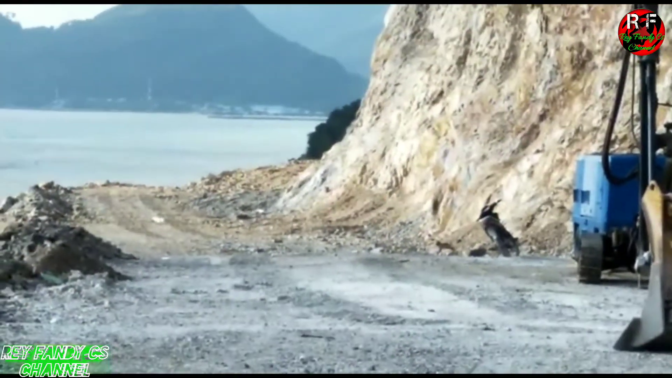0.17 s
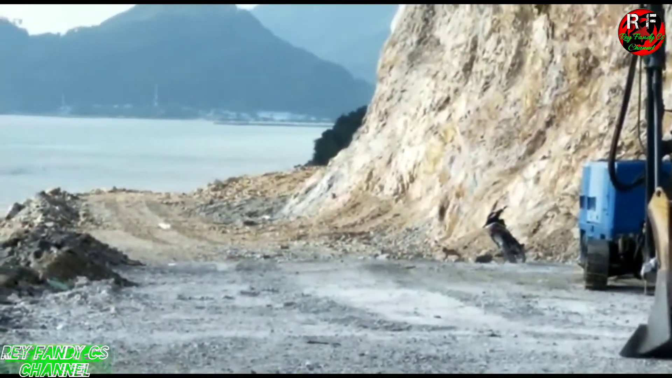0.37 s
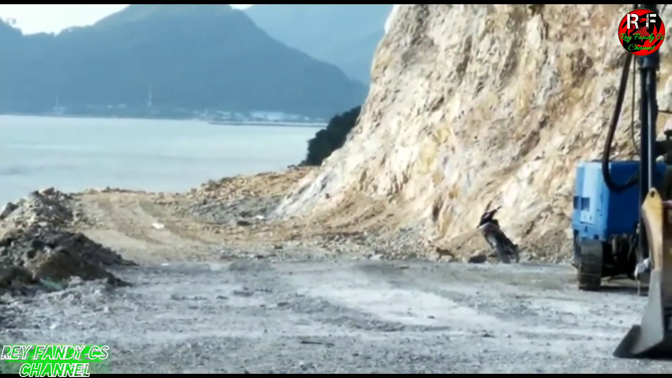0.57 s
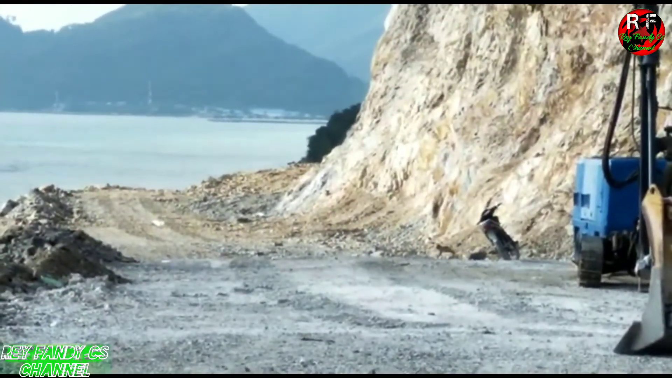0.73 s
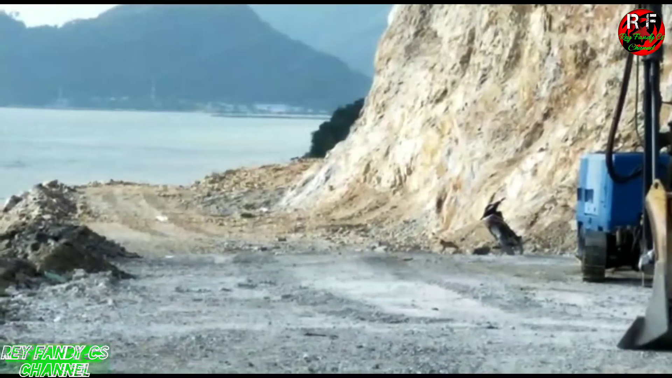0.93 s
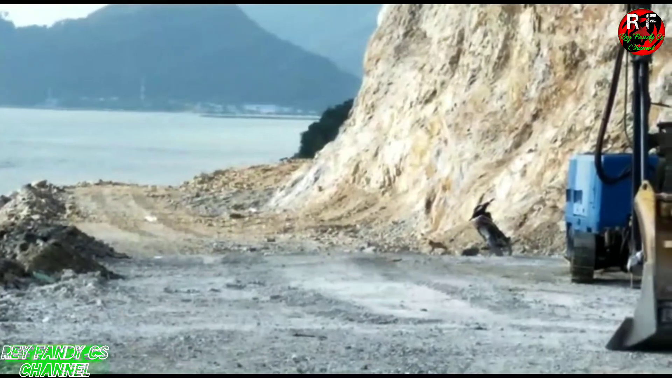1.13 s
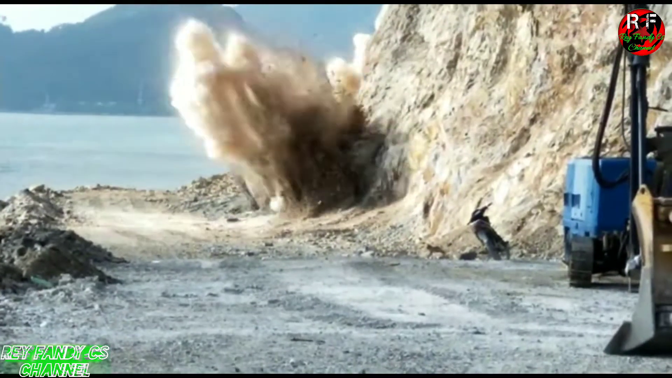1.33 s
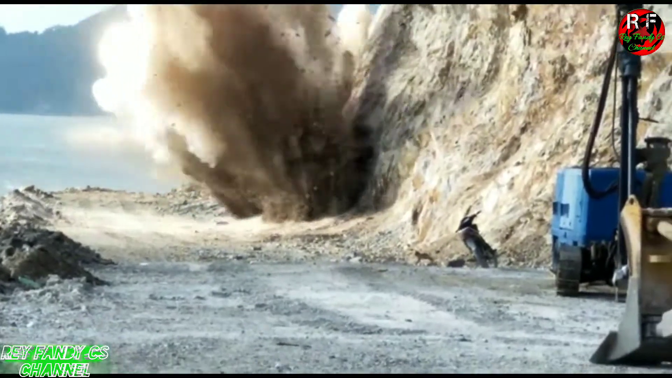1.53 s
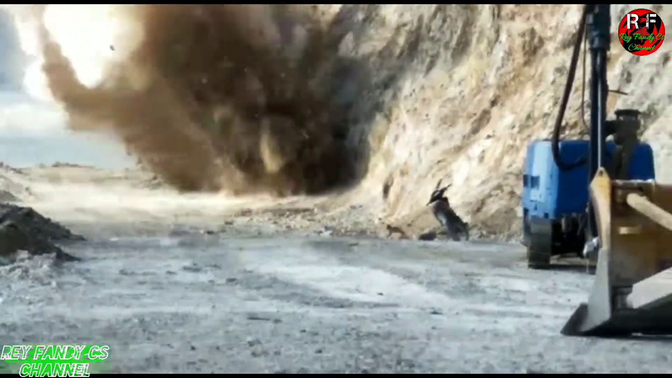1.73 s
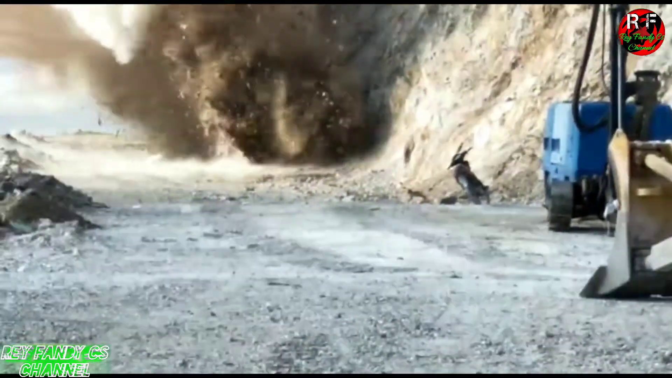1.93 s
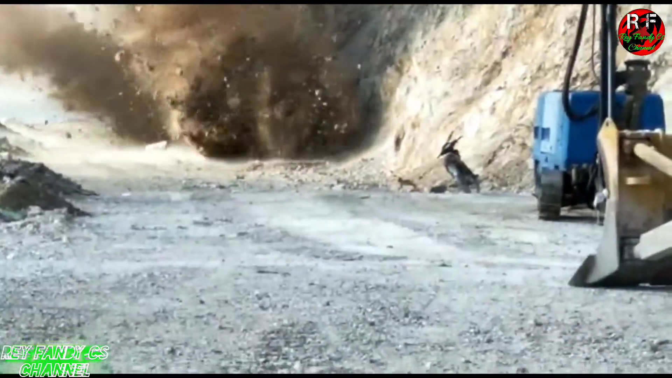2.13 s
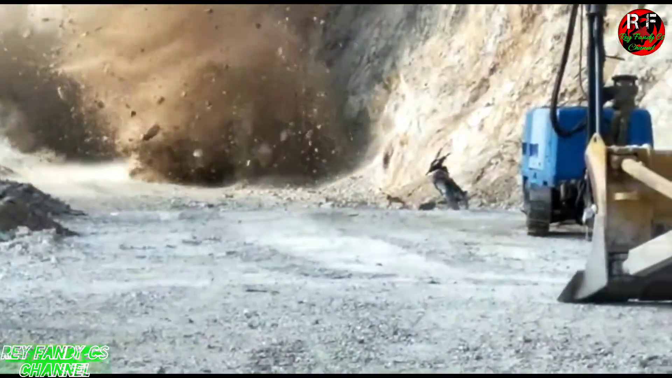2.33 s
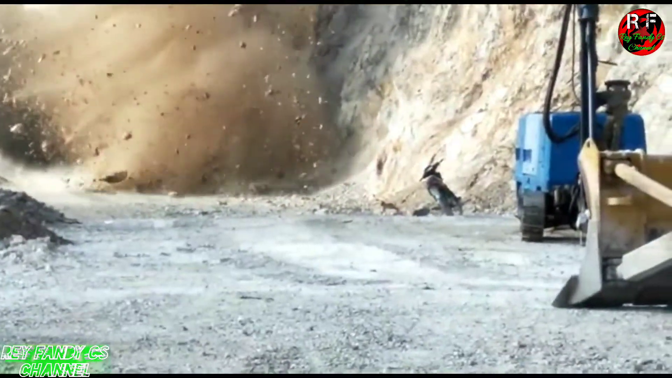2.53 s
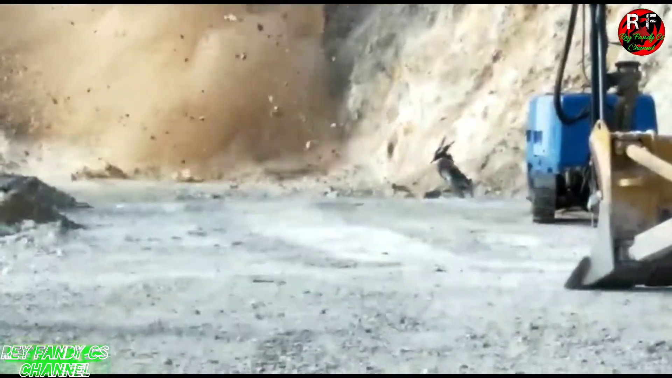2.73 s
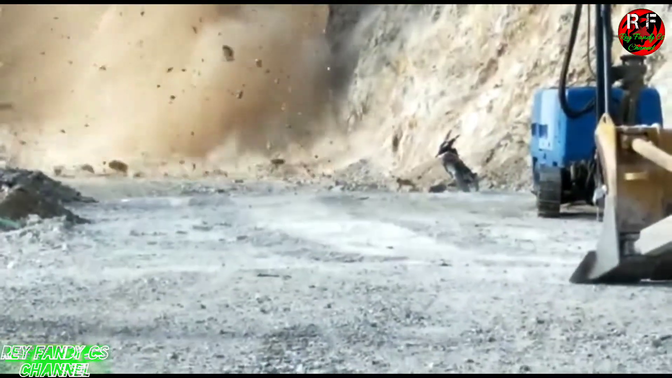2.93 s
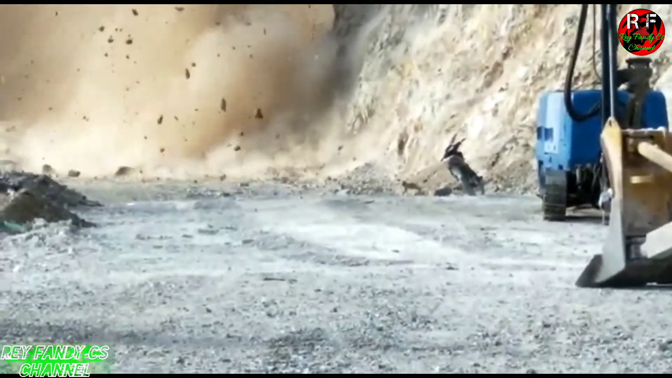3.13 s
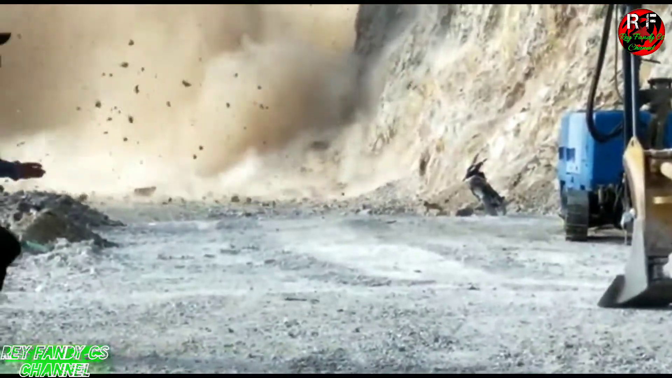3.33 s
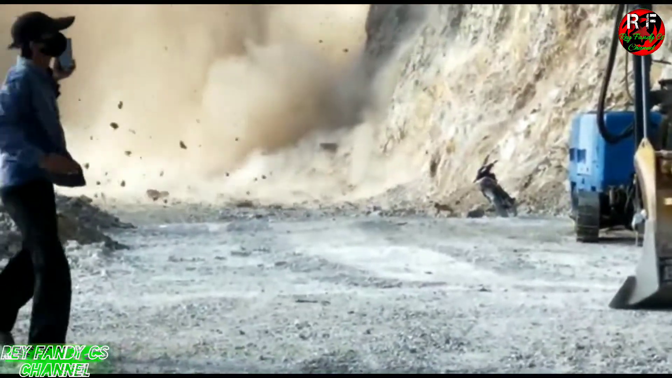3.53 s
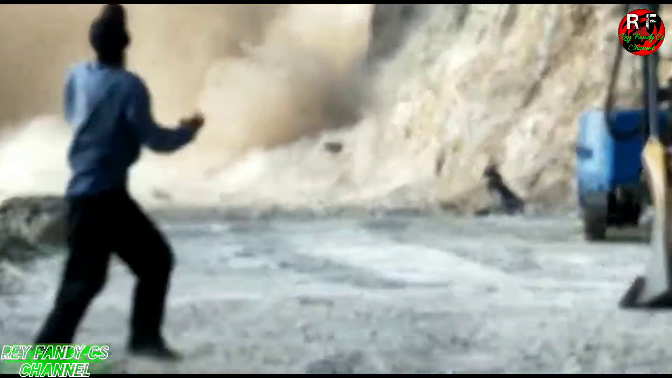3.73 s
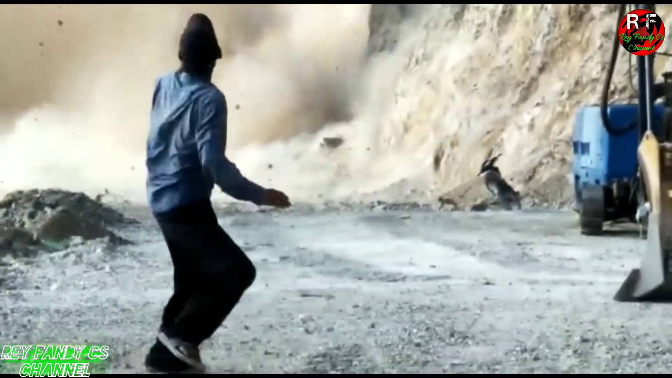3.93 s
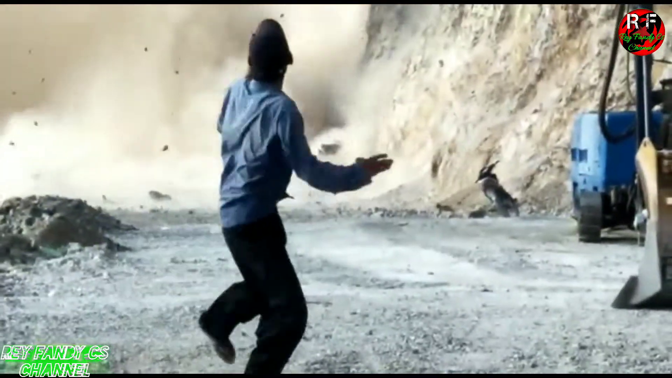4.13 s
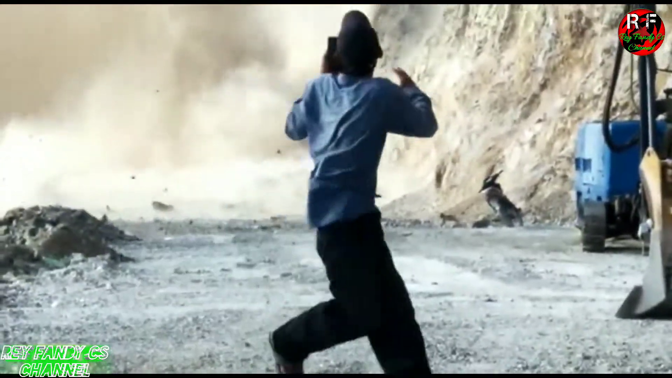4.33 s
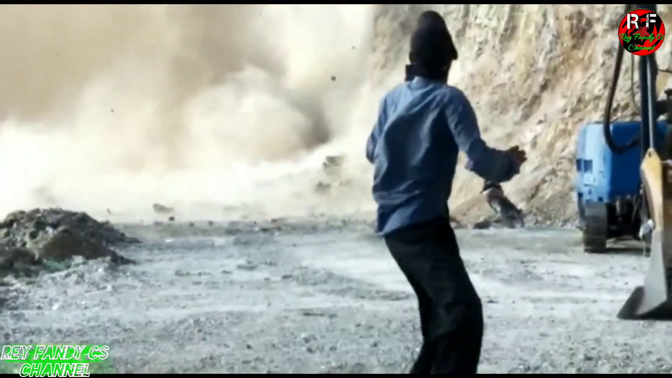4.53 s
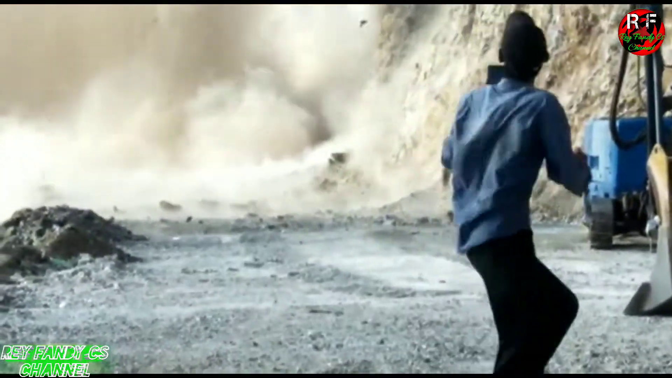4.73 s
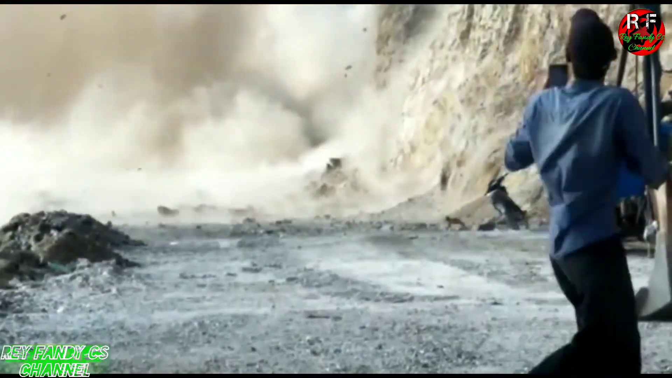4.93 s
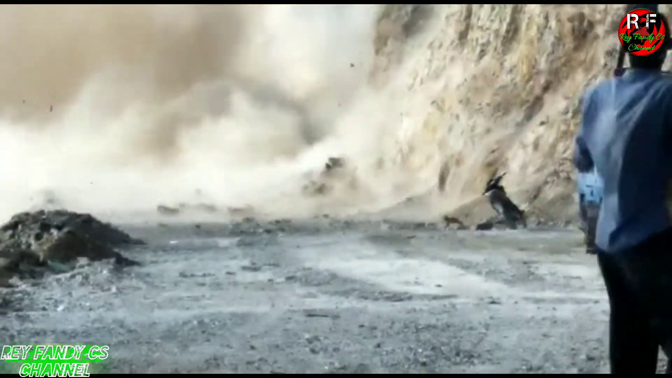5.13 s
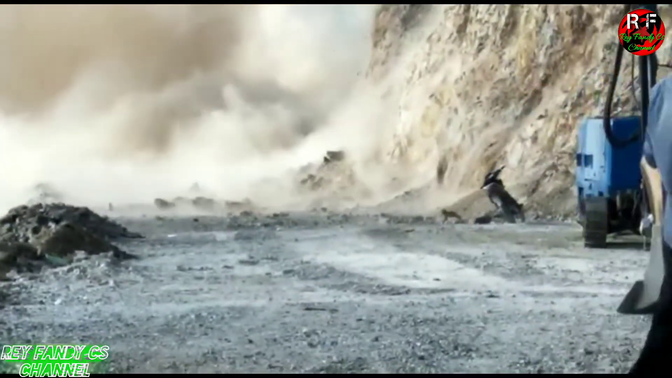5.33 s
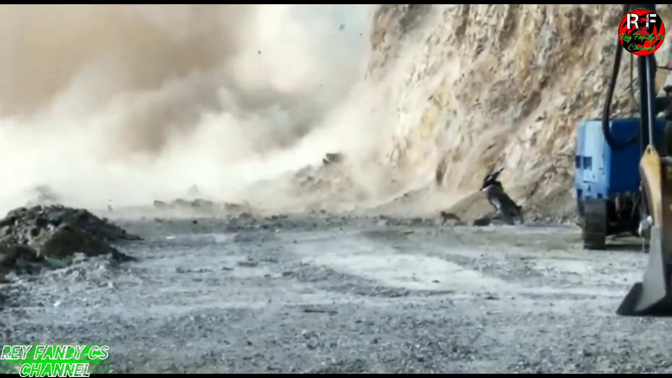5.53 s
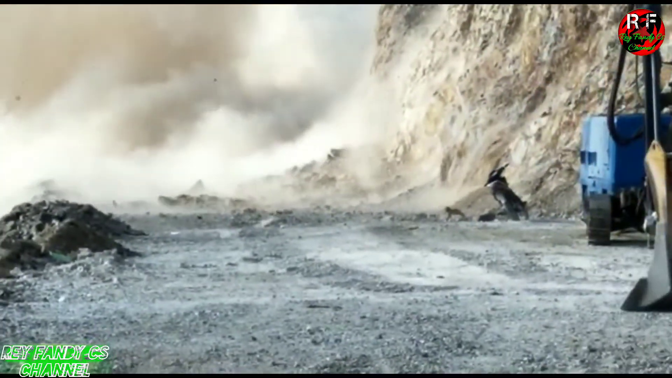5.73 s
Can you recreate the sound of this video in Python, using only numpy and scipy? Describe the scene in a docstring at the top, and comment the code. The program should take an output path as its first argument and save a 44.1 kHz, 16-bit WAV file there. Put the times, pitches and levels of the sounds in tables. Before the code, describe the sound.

Quiet hiss and faint machine hum in an open quarry, heard through a boxy camera microphone. About a second and a half in, rock cracks and a short clipped explosion slams, briefly squashing the level. Deep rumble and boulder thuds follow, then a dense bright patter of falling debris with scattered sharp clicks. It thins gradually, until a fresh rockslide grinds and knocks through the last second.

```python
"""A quarry idles: distant sea, machine hiss, the hum of a drill rig (wavering sines), soft bumps on the camera.
A charge fires: filtered noise and dense blows make the ground shock and the splitting rock, then pulses of
air overload the microphone around one bright snap, and noise puffs of gas vent from the face.
The face rumbles and drops blocks (decaying sines); stones, gravel and then sand shower down with a few ringing
strikes, and heavy rock slides. The camera housing colours everything; its gain control ducks under the blast."""
import sys
import numpy as np
from scipy.fft import rfft, irfft, next_fast_len
from scipy.io import wavfile
from scipy.ndimage import uniform_filter1d, map_coordinates

SR = 44100
rng = np.random.default_rng(int(sys.argv[2]) if len(sys.argv) > 2 else 0)


def bounce(signal):
    """Save signal as a 16-bit WAV file at the path given by the first command-line argument."""
    frames = np.transpose(np.atleast_2d(signal))
    limited = np.clip(frames, -1, 1)
    pcm = np.round(limited * 32767).astype(np.int16)
    wavfile.write(sys.argv[1], SR, pcm)


N = 255339


def amp(db):
    """Decibels to gain."""
    return 10 ** (np.asarray(db) / 20)


def unit(x):
    """Scale to rms 1."""
    return x / np.sqrt(np.mean(x ** 2) + 1e-20)


def clock():
    """The time of each sample in seconds."""
    return np.arange(N) / SR


def fade_in(start_s, rise_s):
    """A straight ramp from silence to full strength."""
    return np.clip((clock() - start_s) / rise_s, 0, 1)


def burst(start_s, level_db, attack_s, hold_s, fall_db_per_s):
    """A sudden envelope: attack, hold, release."""
    release_s = np.maximum(clock() - start_s - attack_s - hold_s, 0)
    return fade_in(start_s, attack_s) * amp(level_db - fall_db_per_s * release_s)


def swell(peak_s, level_db, rise_db_per_s, fall_db_per_s):
    """An envelope that grows to its peak and then dies away."""
    t = clock() - peak_s
    return amp(level_db - rise_db_per_s * np.maximum(-t, 0) - fall_db_per_s * np.maximum(t, 0))


def wobble(knots_per_s):
    """A smooth random curve through evenly spaced random knots."""
    knots = rng.standard_normal(int(N * knots_per_s / SR) + 4)
    return map_coordinates(knots, [clock() * knots_per_s])


def filtered(x, response):
    """x times a response of frequency, padded so that its end does not wrap round."""
    size = next_fast_len(N + SR // 2)
    spectrum = rfft(x, size) * response(np.fft.rfftfreq(size, 1 / SR))
    return irfft(spectrum, size)[:N]


def coloured(x, spectrum):
    """x shaped by a spectrum drawn over log frequency, silent beyond its ends, at rms 1."""
    points_hz, level_db = np.transpose(spectrum)

    def response(hz):
        return amp(np.interp(np.log(hz + 1), np.log(points_hz), level_db, left=-np.inf, right=-np.inf))

    return unit(filtered(x, response))


def noise(spectrum):
    """Coloured noise of rms 1."""
    return coloured(rng.standard_normal(N), spectrum)


def impacts(spectrum, per_second, spread_db, wash):
    """Random blows of uneven size, over noise for the wash of their echoes from the quarry walls."""
    lands = rng.random(N) < per_second / SR
    sizes = amp(spread_db * np.clip(rng.standard_normal(N), -2, 2))
    signs = rng.choice([-1, 1], N)
    return coloured(unit(lands * sizes * signs) + wash * rng.standard_normal(N), spectrum)


# Spectrum of sea and machine hiss: hz, relative level_db
AMBIENT_SPECTRUM = [(15, 9.5), (85, 8.5), (130, 3.5), (300, -0.5), (580, -4), (750, -3.5), (2000, -2),
                    (2800, 0), (4200, -12), (5500, -20.5), (7000, -18.5), (8200, -22), (9500, -29),
                    (15500, -27.5)]
# Hum of the idling rig: pitch_hz, rms level_db
RIG_HUM = [(87, -77), (256, -86)]


def quarry():
    """Distant sea and machine hiss as noise, with rig hum as sines whose phase wanders."""
    hum = np.zeros(N)
    for pitch_hz, level_db in RIG_HUM:
        phase = 2 * np.pi * pitch_hz * clock() + 0.84 * wobble(knots_per_s=9.8)
        hum += amp(level_db) * np.sqrt(2) * np.sin(phase)
    return amp(-63.0) * noise(AMBIENT_SPECTRUM) + hum


# Soft bumps on the camera body: peak_s, level_db
BUMPS = [(.03, -50), (1.3, -56.5)]
# Low rumble spectrum, shared by the bumps and the rockfall: hz, relative level_db
RUMBLE_SPECTRUM = [(12, -12), (22, -3.5), (35, -1), (62, -3.5), (100, -7), (150, -19), (400, -36)]


def handling(width_s):
    """The hand shifts on the camera: bell-shaped swells of low noise."""
    envelope = sum(amp(level_db) * np.exp(-((clock() - s) / width_s) ** 2) for s, level_db in BUMPS)
    return envelope * noise(RUMBLE_SPECTRUM)


# Single stones that strike hard: start_s, level_db, pitch_hz
STRIKES = [(2.081, -46, 2500), (2.174, -39.5, 4570), (2.394, -45.5, 4430), (3.02, -49, 9000),
           (3.399, -56, 8900), (4.689, -52, 11300), (4.705, -41.5, 2030), (4.898, -59, 13000),
           (5.216, -56, 10800), (5.368, -39.5, 1770), (5.771, -44.5, 4140)]
# Spectrum of chips that fly off a struck stone: hz, relative level_db
CHIPS_SPECTRUM = [(1000, -1), (4500, 5), (9000, -8), (15500, -28)]


def strikes(t60_s, chip):
    """Each struck stone rings briefly in four close modes, with a puff of chips."""
    out = np.zeros(N + SR)  # spare room for the last ring
    t = np.arange(SR // 20) / SR
    chips = noise(CHIPS_SPECTRUM)
    for start_s, level_db, pitch_hz in STRIKES:
        modes_hz = pitch_hz * np.exp(0.075 * rng.standard_normal((4, 1)))
        phases = 2 * np.pi * rng.random((4, 1))
        ring = np.sin(2 * np.pi * modes_hz * t + phases).sum(axis=0) / 2
        puff = chips[rng.integers(N - len(t)):][:len(t)]
        decay = amp(level_db - 60 * t / t60_s)
        out[round(start_s * SR):][:len(t)] += decay * (ring + chip * puff)
    return out[:N]


# Falls of debris: peak_s, level_db, rise_db_per_s, fall_db_per_s
STONE_FALL = (3.25, -48.4, 2.8, 9.5)
GRAVEL_FALL = (3.2, -50.2, 5.2, 1.6)
SAND_FALL = (4.2, -57.4, 3.2, 2.3)
# Spectra of the debris: hz, relative level_db
STONES_SPECTRUM = [(700, -11), (1150, -9), (1550, 1), (1900, -3), (2500, 4), (3300, -4), (5000, -10),
                   (7000, -23), (12500, -25), (15500, -33)]
GRAVEL_SPECTRUM = [(1800, -8), (3250, -11), (3600, -4), (3950, 0), (4700, 2), (5300, -4.5), (6200, -11),
                   (10000, -45)]
SAND_SPECTRUM = [(3500, -20), (5800, -1), (6800, -1), (8200, -1.5), (9500, -6), (11800, -10), (13000, -17),
                 (15500, -25)]
# The gravel's ring sinks as the shower goes on: time_s, lower_share (power, 0 to 1)
GRAVEL_SINKS = [(3.0, 0), (4.4, 1)]


def shower():
    """Thrown debris rains down: smaller pieces fall denser and brighter, and the sand peaks last."""
    spread_db = 4

    def gravel_patter(pitch_ratio):
        spectrum = [(hz * pitch_ratio, level_db) for hz, level_db in GRAVEL_SPECTRUM]
        return impacts(spectrum, per_second=2500, spread_db=spread_db, wash=1.34)

    times_s, shares = np.transpose(GRAVEL_SINKS)
    lower = np.interp(clock(), times_s, shares)
    patter = np.sqrt(1 - lower) * gravel_patter(1) + np.sqrt(lower) * gravel_patter(0.95)
    gravel = swell(*GRAVEL_FALL) * patter
    stones = swell(*STONE_FALL) * impacts(STONES_SPECTRUM, per_second=1000, spread_db=spread_db, wash=1.2)
    sand = swell(*SAND_FALL) * impacts(SAND_SPECTRUM, per_second=4000, spread_db=spread_db, wash=1.35)
    return (stones + gravel + sand) * fade_in(1.5, 0.4)


# Big blocks that land: start_s, level_db, pitch_hz
BLOCKS = [(1.834, -29, 35), (1.878, -25, 55.5), (1.942, -30, 70), (1.976, -23, 60.6), (2.16, -26.5, 50),
          (2.268, -30, 70.4), (2.302, -33, 55), (2.352, -30, 60), (3.75, -42, 125), (3.9, -39, 55),
          (5.056, -40, 113), (5.152, -33, 250), (5.228, -35, 124), (5.398, -39, 229), (5.554, -36, 199)]


def blocks(swings):
    """Each block lands with a deep, dull sine thump that falls 60 dB in a few swings."""
    out = np.zeros(N)
    for start_s, level_db, pitch_hz in BLOCKS:
        cycles = pitch_hz * np.maximum(clock() - start_s, 0)
        decay = amp(level_db - 60 * cycles / swings)
        out += decay * fade_in(start_s, 0.0056) * np.sin(2 * np.pi * cycles)
    return out


def driven(flow, level_db, growth):
    """The strength of a layer that grows by so many dB per dB of rock flow."""
    reference_flow = amp(-46)  # here the layer plays at level_db
    return amp(level_db) * (flow / reference_flow) ** growth


# The mass heaves out, then its boulders land: start_s, level_db, attack_s, hold_s, fall_db_per_s
HEAVE = (1.635, -30, 0.06, 0.17, 31)
COLLAPSE = (1.635, -42.6, 0.16, 0.08, 8.1)
# A small slip of the pile, then the big slide: peak_s, level_db, rise_db_per_s, fall_db_per_s
SLIP = (3.8, -57.5, 20, 15)
SLIDE = (5.3, -46.4, 16.5, 0.1)
# How layers follow the flow of rock: level_db at the reference flow, growth in dB per dB
RUMBLE_LAW = (-44, 0.7)
ROCK_LAW = (-50.7, 0.68)
GRIND_LAW = (-47.9, 0.31)
# Spectra of thumping boulders, clattering rocks and grinding stones: hz, relative level_db
BOULDERS_SPECTRUM = [(60, -1), (120, 2), (200, 0), (280, -3), (400, -7.5), (600, -16), (1200, -53),
                     (3000, -65)]
ROCKS_SPECTRUM = [(200, -27), (500, -8.5), (700, 1), (950, 0), (1150, -5.5), (1900, -2.5), (3200, -13),
                  (8000, -38)]
GRIND_SPECTRUM = [(600, -13), (950, -3), (1150, -2.5), (1500, -0.5), (2000, 1), (2400, -1), (2800, 1.3),
                  (3400, -0.5), (5000, -12), (10000, -40)]


def rockfall():
    """The face collapses and later slides; the flow of rock drives rumble, thumps, clatter and grinding."""
    start_s = COLLAPSE[0]
    collapse = burst(*COLLAPSE)
    slide = swell(*SLIDE) * fade_in(start_s, 1.5)
    sliding = np.hypot(swell(*SLIP), slide)
    flow = np.hypot(collapse, sliding)
    # The first boulders drop on bare ground and rumble less than the slide.
    shaking = driven(np.hypot(amp(-5.5) * collapse, sliding), *RUMBLE_LAW)
    rumble = np.hypot(burst(*HEAVE), shaking) * noise(RUMBLE_SPECTRUM)
    boulders = amp(1.2) * flow * impacts(BOULDERS_SPECTRUM, per_second=220, spread_db=2.5, wash=1.0)
    clatter = driven(np.hypot(collapse, slide), *ROCK_LAW) * fade_in(start_s, 0.4)
    rocks = clatter * impacts(ROCKS_SPECTRUM, per_second=400, spread_db=4, wash=1.2)
    grinding = driven(slide, *GRIND_LAW) * impacts(GRIND_SPECTRUM, per_second=900, spread_db=4, wash=1.3)
    return rumble + boulders + rocks + grinding


# Jets of gas and grit from the opening face: start_s, level_db, rise_s, decay_s
JETS = [(1.63, -36.5, 0.027, 0.042), (1.735, -35.3, 0.038, 0.055)]
# Spectrum of the jets: hz, relative level_db
JET_SPECTRUM = [(100, -2), (400, 8), (900, -2), (2400, -2), (4400, -11.5), (6000, -15.5), (8000, -20),
                (15500, -36)]


def jets():
    """Gas escapes in puffs of noise that swell and die away."""
    strength = np.zeros(N)
    for start_s, level_db, rise_s, decay_s in JETS:
        decay = np.exp(-np.maximum(clock() - start_s - rise_s, 0) / decay_s)
        strength += amp(level_db) * fade_in(start_s, rise_s) * decay
    return strength * noise(JET_SPECTRUM)


# The face splits in steps: peak_s, level_db
FRACTURES = [(1.418, -37), (1.495, -35.5), (1.537, -35.5), (1.588, -28.3), (1.66, -34.5)]
# Thuds as the shock arrives and as the rock breaks loose: start_s, level_db, attack_s, hold_s, fall_db_per_s
THUMPS = [(1.384, -31, 0.03, 0.035, 140), (1.635, -29, 0.02, 0.04, 220)]
# Spectra of the thud, the tearing and the splintering face: hz, relative level_db
THUD_SPECTRUM = [(20, 4), (50, 4.5), (110, 6), (170, 4), (260, -10.5), (400, -13), (600, -21),
                 (1500, -57.5)]
FRACTURE_SPECTRUM = [(80, -38), (170, -6.5), (235, 2), (290, -5), (350, -9.5), (600, -21), (850, -17.5),
                     (1200, -29.5), (2500, -49), (8000, -72)]
SPLINTERS_SPECTRUM = [(400, -11), (800, 3.5), (1150, -11), (1600, -9), (2400, -13.5), (3300, -24),
                      (5000, -31), (12000, -56), (15500, -66)]


def ground_shock():
    """The shock runs through rock ahead of the air wave; the face thuds, then tears open with bright splinters."""
    steps = [swell(s, level_db, rise_db_per_s=420, fall_db_per_s=260) for s, level_db in FRACTURES]
    strain = np.sqrt(sum(step ** 2 for step in steps))
    thud = sum(burst(*thump) for thump in THUMPS) * noise(THUD_SPECTRUM)
    tearing = strain * fade_in(THUMPS[0][0], 0.025)
    tearing = tearing * impacts(FRACTURE_SPECTRUM, per_second=900, spread_db=4.5, wash=1)
    splinters = amp(-6.5) * strain * fade_in(1.465, 0.14)
    splinters = splinters * impacts(SPLINTERS_SPECTRUM, per_second=1500, spread_db=1, wash=0.38)
    return thud + tearing + splinters


# Tones in the snap of the bursting face: pitch_hz, level_db
SNAP = [(2400, -22), (3100, -33), (3900, -31), (5450, -33)]


def crack(start_s, life_s):
    """The face bursts with one bright snap of sines, only a few cycles long."""
    t = clock() - start_s
    ring = sum(amp(level_db) * np.sin(2 * np.pi * (hz * t + rng.random())) for hz, level_db in SNAP)
    return (t > 0) * np.exp(-(t / life_s) ** 2) * ring


# Air waves of the staggered charges: start_s, push_db, push_s, suction_db, suction_s
AIR_WAVES = [(1.6035, -21.5, 0.0104, -12, 0.0141), (1.628, -13, .0102, -21, 0.012),
             (1.672, -27, 0.0067, -24, 0.016), (1.721, -18.5, .011, -29, .013)]


def air_waves(softness):
    """Each charge gives a short push of air, then a suction."""
    def lobe(start_s, length_s):
        return np.abs(np.sin(np.pi * fade_in(start_s, length_s))) ** softness

    pressure = np.zeros(N)
    for start_s, push_db, push_s, suction_db, suction_s in AIR_WAVES:
        pressure += amp(push_db) * lobe(start_s, push_s)
        pressure -= amp(suction_db) * lobe(start_s + push_s, suction_s)
    return pressure


def scene():
    """The blast and its fallout over the quiet quarry."""
    background = quarry() + handling(width_s=0.041)
    fallout = strikes(t60_s=0.029, chip=0.55) + shower() + blocks(swings=7) + rockfall()
    blast = jets() + ground_shock() + crack(start_s=1.613, life_s=0.0025) + air_waves(softness=0.85)
    return (background + fallout + blast)[None]


# Air resonances of the camera housing: pitch_hz, width_hz, lift_db
HOUSING = [(914, 326, 3.5), (1493, 186, 2), (2405, 410, 3.5), (4330, 550, 6), (7550, 630, 3)]


def housing(hz):
    """Each cavity in front of the microphone resonates and lifts a narrow band."""
    response = 1
    for pitch_hz, width_hz, lift_db in HOUSING:
        damping = 1j * hz * width_hz
        response = response + (amp(lift_db) - 1) * damping / (pitch_hz ** 2 - hz ** 2 + damping)
    return response


def gain_control(x, limit_db, release_s):
    """The gain drops at once when the level passes the limit, then creeps back."""
    level = np.sqrt(np.abs(uniform_filter1d(x * x, size=400)) + 1e-12)
    excess_db = np.maximum(20 * np.log10(level) - limit_db, 0)
    recovery = np.exp(-clock() / release_s)
    # The running maximum holds each reduction while it decays.
    reduction_db = np.maximum.accumulate(excess_db / recovery) * recovery
    return x * amp(-reduction_db)


def record(dry):
    """The microphone saturates: air waves flatten against its limit and choke every other sound."""
    x = filtered(dry[0], housing)
    limit, hardness = amp(-21.5), 5
    clipped = x / (1 + np.abs(x / limit) ** hardness) ** (1 / hardness)
    levelled = gain_control(clipped, limit_db=-27.0, release_s=0.24)
    corner_hz, top_hz = 14300, 15600  # treble rolls off, then stops

    def treble_limit(hz):
        return (hz < top_hz) / np.sqrt(1 + (hz / corner_hz) ** 10)

    return filtered(levelled, treble_limit)[None]


dry = scene()
out = record(dry)
bounce(out)
```